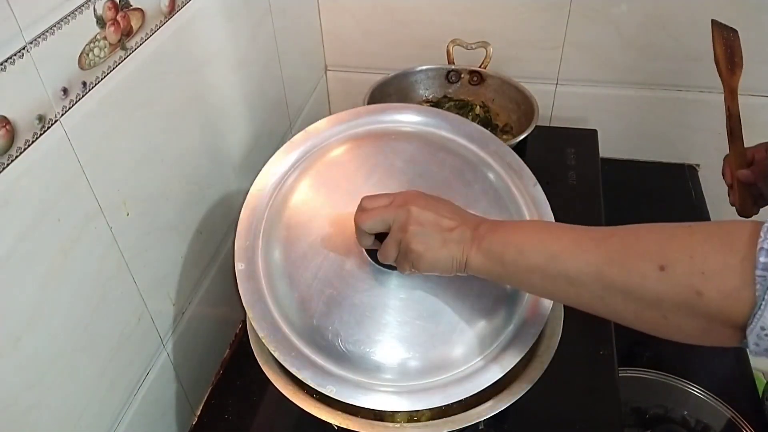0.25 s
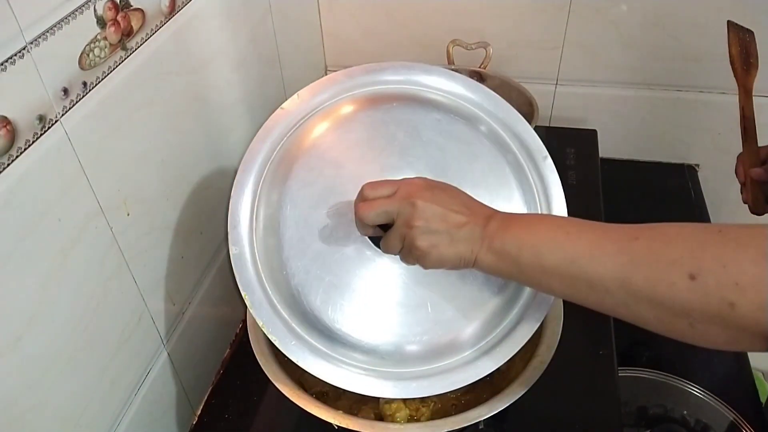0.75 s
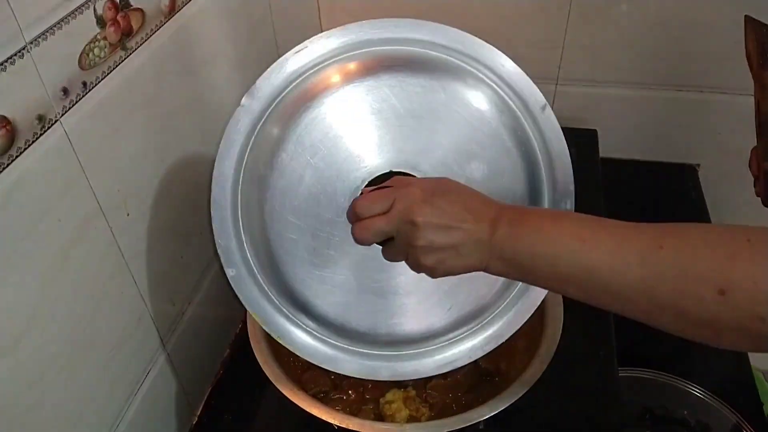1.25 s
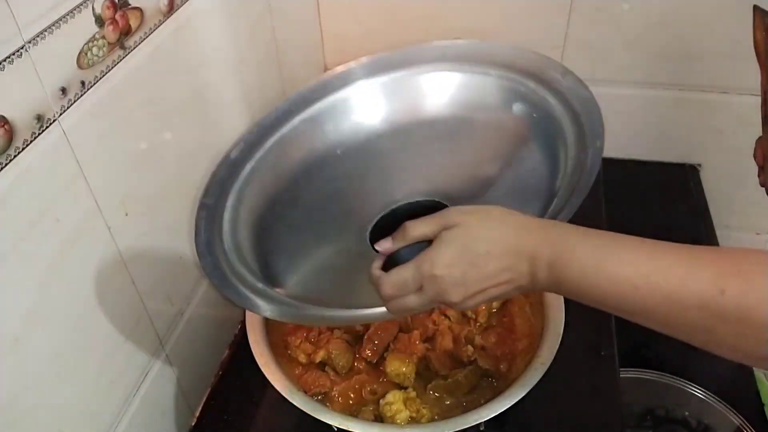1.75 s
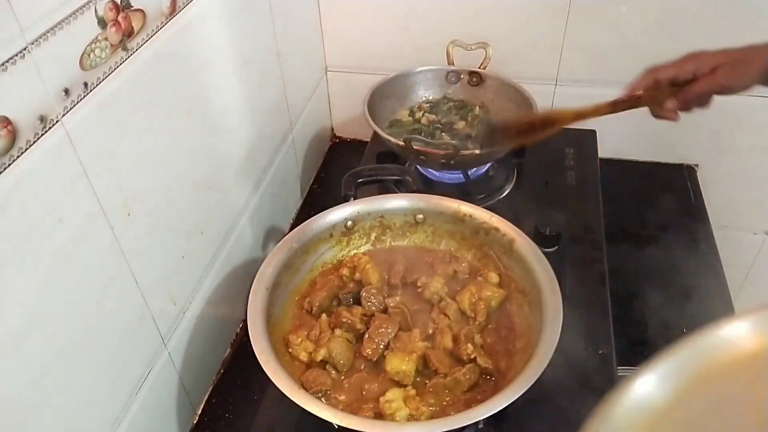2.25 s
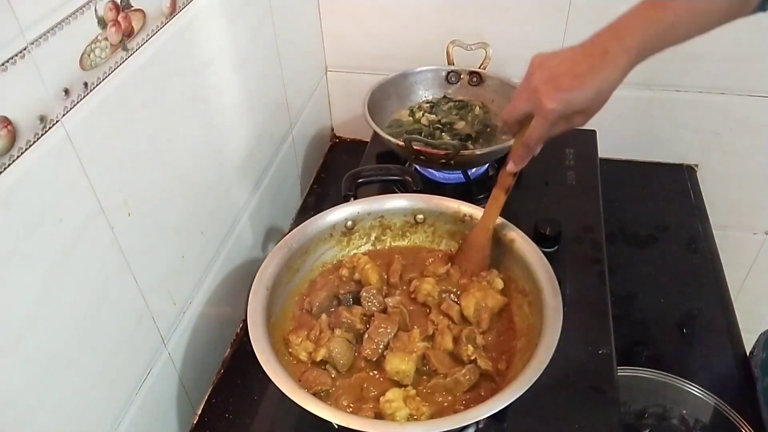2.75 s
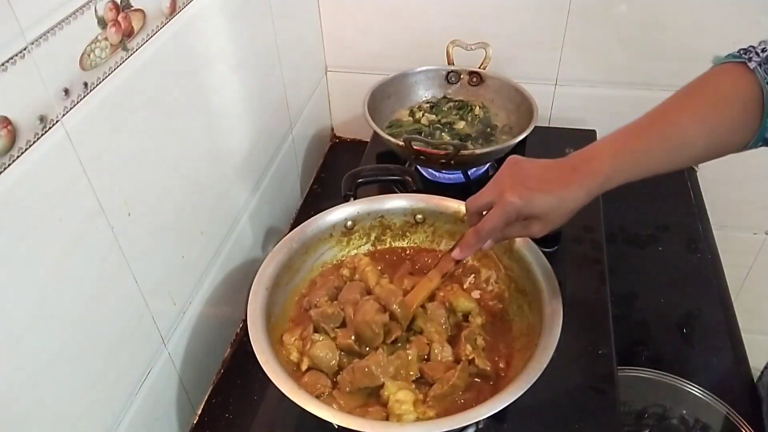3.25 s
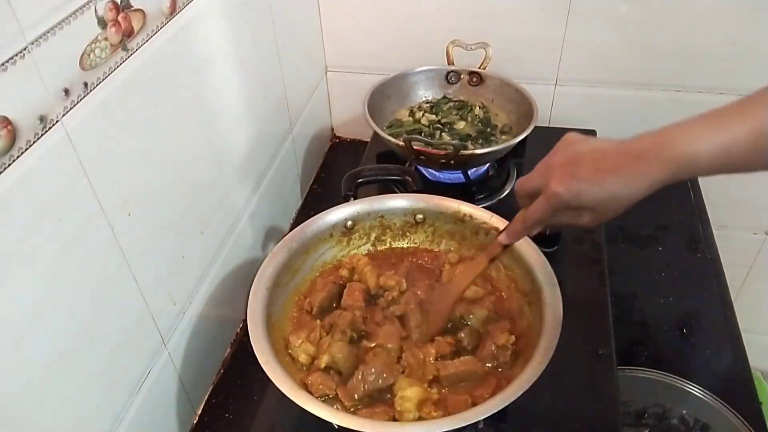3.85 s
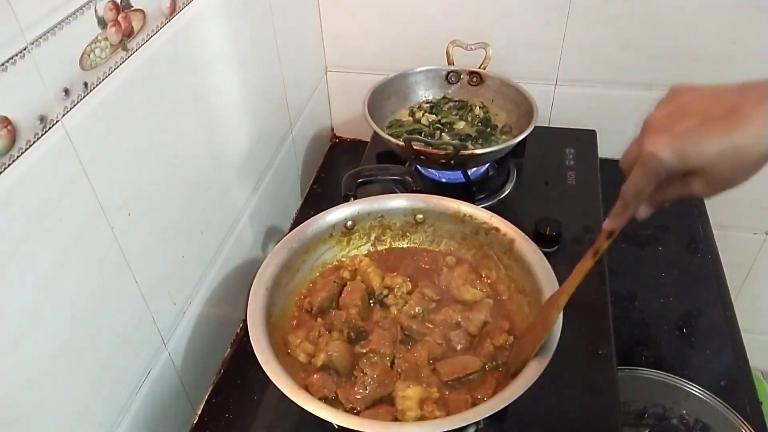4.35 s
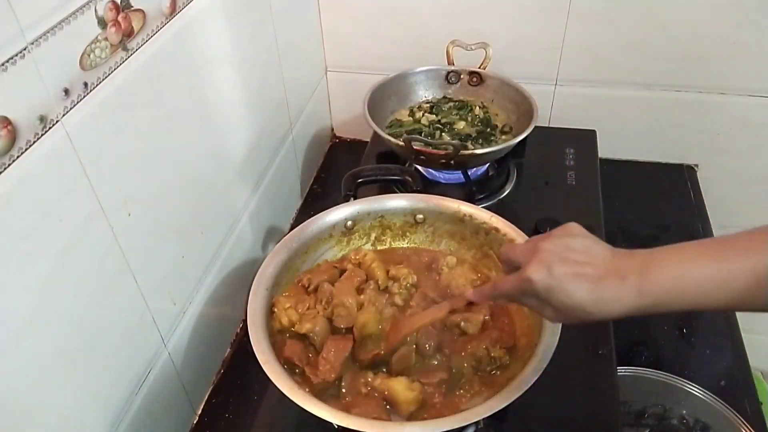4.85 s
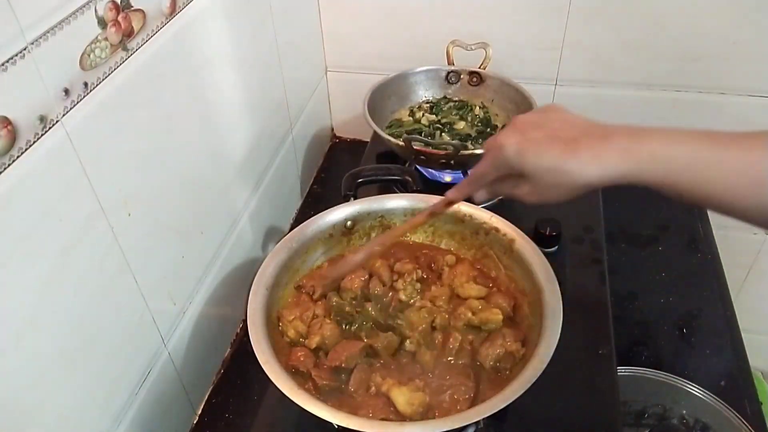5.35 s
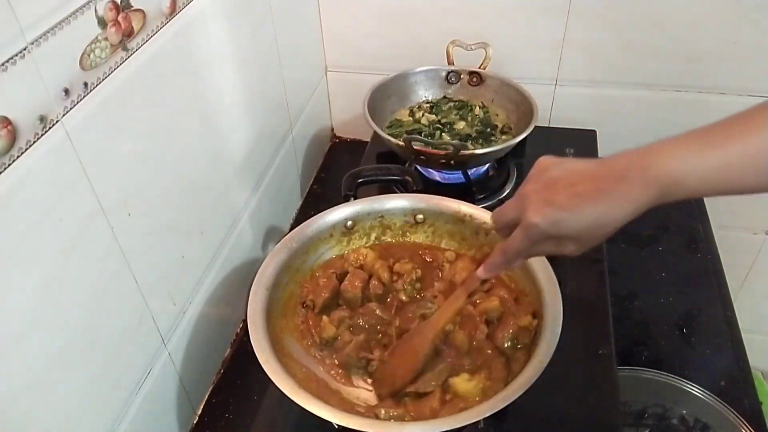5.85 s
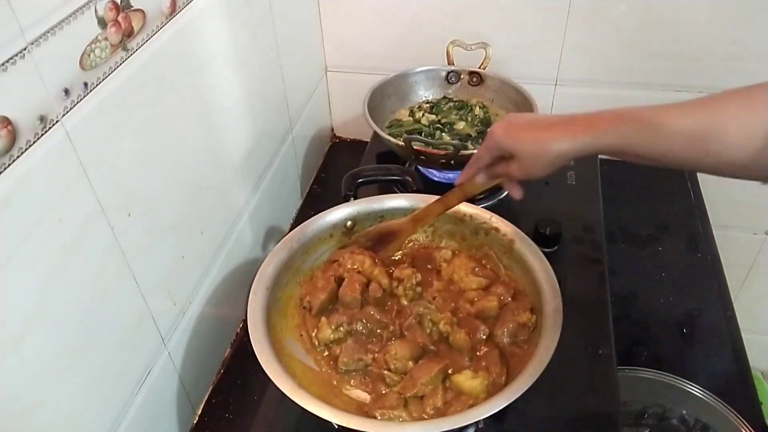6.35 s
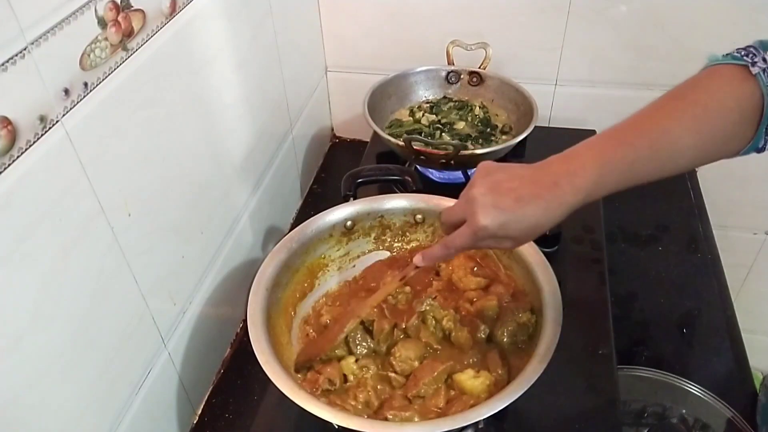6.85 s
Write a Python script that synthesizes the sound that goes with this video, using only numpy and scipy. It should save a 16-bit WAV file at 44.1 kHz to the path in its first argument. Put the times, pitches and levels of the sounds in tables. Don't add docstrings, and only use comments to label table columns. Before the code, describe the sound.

A metal pot lid scrapes off with a ring, a wooden spatula stirs simmering curry, the lid clatters loudly down, then scraping and tapping continue.

```python
import sys
import numpy as np
from scipy import signal
from scipy.fft import rfft, irfft, next_fast_len
from scipy.io import wavfile
from scipy.ndimage import uniform_filter1d, map_coordinates

SR = 44100
rng = np.random.default_rng(int(sys.argv[2]) if len(sys.argv) > 2 else 0)


def wrap_up_sound(samples):
    columns = np.atleast_2d(samples).T
    tamed = np.clip(columns, -1, 1)
    steps = np.round(tamed * 32767).astype(np.int16)
    wavfile.write(sys.argv[1], SR, steps)


def voltage_ratio(decibels):
    exponent = np.asarray(decibels, float) / 20
    return 10 ** exponent


N = 312993

# pitch_hz, level_db
SIMMER_COLOUR = [(15, -54), (25, -24), (127, -6.5), (394, -7), (451, -14.5), (575, -4.5), (887, -11),
                 (1740, -8.5), (2280, -8.5), (4610, -9.5), (5500, -17), (6200, -13.5), (7310, -9),
                 (11000, -20), (14800, -17), (16000, -13.5)]
SIMMER_DB = -52.5
# pitch_hz, level_db
AIR_NOTES = [
    [(549, -7), (566, 2), (605, 2), (708, -4.5), (1135, -4.5), (1168, -3.5), (1642, -10), (1755, -6.5),
     (2105, -10), (2789, -5.5)],
    [(1003, -1), (1022, -1.5)],
    [(505, 7.5), (1130, -18)],
]
# start_s, length_s, level_db
AIR_HUMS = [
    [(-.1, 0.72, -50.5), (.4, 0.98, -54), (1.4, 0.75, -61), (3.5, 0.16, -55.5), (4.75, 0.15, -48.5)],
    [(1.05, 1, -64), (1.85, 0.44, -56), (2.65, 0.96, -53)],
    [(0, 1, -62.5), (2.12, 0.065, -62), (2.75, 0.15, -61.5), (5.08, 0.15, -60.5)],
]
HUM_RISE_S, HUM_FALL_DB_S = 0.073, 62

# start_s, length_s, scrape_db, sizzle_over_scrape_db, depth_db
LID_MOVES = [(-.02, 0.075, -40.5, -2, -1.5), (0.053, 0.055, -38, -0.5, -3.5), (0.146, 0.19, -48, 2.5, -2),
             (0.268, 0.16, -50, 2.5, -3.5), (0.41, 0.51, -54, -3, -5.5), (0.963, 0.11, -53, -10, -3.5),
             (1.203, 0.24, -52.5, -10, -7), (1.548, 0.052, -53.5, -4, 2.5), (1.724, 0.097, -49.5, -3.5, -4),
             (1.804, 0.2, -53, -8, -1), (1.97, 0.42, -61, 5.5, 8), (2.43, 0.091, -56.5, 5, 2.5),
             (2.495, 0.19, -59, 1, -2)]
# start_s, length_s, scrape_db, sizzle_over_scrape_db, depth_db
FOOD_TURNS = [(2.645, 0.07, -54.5, -6, 4), (2.7, 0.21, -47.5, -1, -5), (2.885, 0.053, -48.5, 7, 10),
              (2.91, 0.29, -48.5, 1.5, 1.5), (3.169, 0.13, -49.5, -2, -3), (3.27, 0.35, -51, 0, 0.5),
              (3.46, 0.37, -52, -18, -20), (3.638, 0.11, -47.5, -1.5, -6), (3.76, 0.24, -56.5, -23, -1.5),
              (3.91, 0.14, -52.5, -2, -6.5), (4.17, 0.027, -64, -6, -3), (4.27, 0.32, -57, -12, 2)]
# start_s, length_s, scrape_db, sizzle_over_scrape_db, depth_db
WALL_SCRAPES = [(4.92, 0.17, -49.5, 2, -20), (5.1, 0.061, -57, 7, -24), (5.56, 0.094, -59, 7, -13),
                (5.6, 0.12, -47, -1.5, -6.5), (5.698, 0.1, -36, -3.5, -7), (5.8, .14, -37, -6, -9.5),
                (5.94, 0.026, -49, -4, 2), (6.0, 0.16, -59, -2, 1), (6.26, .1, -52.5, -16, -4.5),
                (6.33, 0.1, -44, -6.5, -6.5), (6.42, .17, -46.5, -2, 1.5), (6.705, 0.052, -61.5, 11.5, 3),
                (6.84, 0.2, -55, -1.5, -4), (7, 0.049, -54.5, -3, -1)]
STROKE_RISE_S, RISE_SHARE = 0.015, 0.34
STROKE_FALL_DB_S, DEEP_DB = 155, 1.5
# pitch_hz, level_db
SCRAPE_COLOUR = [(350, -4.5), (620, 3), (771, 8), (1590, 8.5), (1940, 7.5), (3600, -1), (6000, -8),
                 (7800, -19), (13200, -120)]
# pitch_hz, width_hz, level_db
POT_MODES = [(1360, 140, -16), (1900, 48, -3), (3290, 370, -1), (4400, 100, -14)]
# pitch_hz, level_db
SIZZLE_COLOUR = [(2060, -29), (3500, -6), (3660, -30), (4400, -2.5), (5460, -13), (7130, 3.5), (8310, -5),
                 (10600, -8.5), (14900, -9.5), (16000, -5)]
# start_s, length_s, level_db
SLOSHES = [(-.02, 0.024, -39.5), (0.07, 0.14, -45.5), (0.2, 0.19, -50.5), (1.303, 0.041, -55.5),
           (2.18, 0.059, -60), (2.87, 0.084, -52), (3.49, 0.073, -65), (4.387, 0.15, -56.5),
           (5.612, 0.1, -52.5), (5.777, 0.22, -47.5), (6.004, 0.22, -60.5), (6.3, 0.21, -54),
           (6.51, 0.033, -47.5), (7.003, 0.079, -55)]
SLOSH_RISE_S, SLOSH_FALL_DB_S, BUBBLING_DB = 0.036, 206, -65
# pitch_hz, width_hz, level_db
SAUCE_MODES = [(314, 49, 3.5), (410, 55, 2), (549, 66, 0.5), (725, 23, -3)]
# start_s, length_s, level_db
SHAKES = [(-.02, 0.029, -44), (0.042, 0.35, -50.5), (1.192, 0.32, -61), (1.787, 0.14, -55),
          (2.152, 0.11, -52), (3.3, 0.2, -63), (5.783, 0.044, -39.5), (5.86, 0.13, -43),
          (5.977, 0.068, -37), (6.154, 0.028, -50), (6.735, 0.26, -64), (6.994, 0.077, -55.5)]
SHAKE_RISE_S, SHAKE_FALL_DB_S, FLAME_DB = 0.031, 147, -70.5
# pitch_hz, width_hz, level_db
STOVE_MODES = [(84, 14, -2), (146.8, 11.8, 3.5), (224, 76, -9)]

# start_s, peak_db, pitch_hz, t60_s, left_minus_right_db
TOUCHES = [(0.00407, -34.5, 813, 0.23, 2), (0.0866, -26, 2336, 0.1, 0), (0.15, -36.5, 2336, 0.38, 0),
           (4.417, -31.5, 1304, 0.26, 9), (4.418, -26, 1740, 0.037, 6), (4.417, -46, 2330, 0.14, 7),
           (4.417, -45, 4470, 0.2, -2), (4.417, -47.5, 3600, 0.25, 0.1), (6.304, -36.5, 330, 0.11, 0),
           (5.9, -37, 2000, 0.2, -3), (2, -49, 148, 0.17, 0), (1.872, -51, 148, 0.16, -5),
           (5.945, -33, 151, 0.27, 0), (6.548, -40, 314, 0.19, 1), (2.9, -39, 318, 0.077, .5),
           (2.19, -41.5, 148, 0.48, 0), (5.803, -32.5, 170, 0.28, -2.5), (5.992, -33, 82.4, 0.45, 1),
           (5.993, -37, 149.5, 0.3, 7)]
# start_s, peak_db, pitch_hz, t60_s, left_minus_right_db
LID_NOTES = [(.02, -42, 3620, 0.26, 3), (.062, -33, 3620, 0.16, 0), (0.036, -22.5, 410, .04, 4),
             (0.056, -21, 435, 0.065, 3), (0.065, -26, 428, .08, -5), (0.09, -34, 3140, .2, 5),
             (0.127, -39, 3140, 0.15, 0), (.106, -25.5, 2336, 0.14, -3), (.04, -35, 813, .15, 4),
             (4.52, -22.5, 1821, 0.12, -7), (4.52, -32, 1607, 0.24, 0), (4.523, -28.5, 2600, 0.13, 3),
             (4.61, -24, 303, 0.18, -6), (4.612, -21.5, 2587, 0.14, -6), (4.612, -24.5, 2708, 0.15, 6),
             (4.64, -29, 2605, .12, -1), (4.642, -24, 2310, .12, 0), (4.655, -16, 1618, 0.1, -2),
             (4.656, -26, 1507, 0.16, 1), (4.67, -23.5, 380.6, 0.4, 0), (4.716, -24, 1832, 0.069, -2),
             (4.611, -27, 6884, 0.18, 6), (4.612, -29, 6540, 0.16, 4), (4.642, -27, 6930, 0.11, 0),
             (4.642, -33, 8200, 0.097, 0), (4.418, -45, 332, 0.17, -2), (4.535, -35, 947, 0.13, 7),
             (4.745, -33, 382.4, 0.23, -7)]
# start_s, peak_db
SKIPS = [
    (6.766, -34.5),
    (6.806, -35),
    (6.85, -44),
    (6.876, -44),
    (6.903, -42),
    (6.935, -44),
]
SKIP_HZ, SKIP_T60_S = 932, 0.075
WAVER_RAD = 0.36

# start_s, peak_db, low_db, bright_db, left_minus_right_db
LIFT = [
    (0.012, -28.5, 4, -34, 1.0),
    (0.036, -23.5, -2.5, -23, 0.5),
    (0.065, -26, -0.5, -0.5, 0.0),
    (0.092, -24.5, -18, -2, 1.7),
    (0.107, -30, -32, -3, -1.0),
]
# pitch_hz, width_hz, level_db
RIM_MODES = [(350, 42, 3.5), (435, 45, 0.5), (813, 30, -10.5), (1252, 26, -9), (1670, 21, -13.5),
             (2336, 42, -10), (3240, 32, -21), (3650, 48, -12.5), (4370, 240, -20.5), (6900, 90, -30),
             (7770, 130, -29), (9400, 60, -24)]
# start_s, peak_db, low_db, bright_db, left_minus_right_db
TIP = [
    (4.515, -21, -3, -24, -2.5),
    (4.533, -23.5, -15, -21, 0),
    (4.559, -25, -12, -31, 4),
]
# pitch_hz, width_hz, level_db
EDGE_MODES = [(204, 143, 9), (965, 23, 0), (1600, 120, -0.5), (1870, 140, 4.5), (2330, 85, -1.5),
              (3360, 140, -3), (4200, 110, -10)]
# start_s, peak_db, low_db, bright_db, left_minus_right_db
CLATTER = [
    (4.601, -16, -4.5, -17, 4),
    (4.61, -11.5, -7.5, -13.5, -2),
    (4.639, -10.5, -12, -13.5, -3),
    (4.657, -16, 1.5, -28, -1),
    (4.674, -27, -1, -18, 0),
    (4.704, -17, -1.5, -5.5, 3),
    (4.719, -20.5, -3, -21, -1),
    (4.754, -30, 4, -25, 3),
]
# pitch_hz, width_hz, level_db
LID_MODES = [(150, 88, -5), (230, 40, 0), (300, 60, -5), (382, 45, 5), (437, 45, 1), (680, 114, -14),
             (932, 40, -10), (1518, 45, -2), (1611, 45, 0), (1660, 50, -6), (1821, 60, -9),
             (1893, 60, -9), (2225, 55, -7), (2351, 55, -7), (2610, 60, -12),
             (3151, 40, -11), (3750, 60, -12), (4740, 45, -12), (5626, 60, -16), (6300, 70, -14),
                  (6884, 45, -7), (7284, 60, -13), (7559, 45, -7), (8310, 60, -16)]
# pitch_hz, level_db
RATTLE_COLOUR = [(29, -59), (50, -29), (138, -10), (258, -0.5), (371, 3.5), (572, -26), (905, -11),
                 (1330, -11), (1620, -6), (5950, -9.5), (7390, -9), (16000, -22.5)]
DAMPING = 1.6
SPOT_DB, RATTLE_GRIT_DB = 2.5, 2.5

# start_s, peak_db, centre_hz, left_minus_right_db
KNOCKS = [(1.6, -35, 3970, 0), (1.785, -34.5, 4400, 0), (2.3, -36.5, 3680, -2), (2.616, -41, 977, 0),
          (2.66, -30, 1210, -1), (2.845, -35, 2170, -2), (3.252, -39, 1500, -3), (3.433, -37, 3400, 0),
          (2.899, -34, 816, .5), (2.945, -35, 1300, 0), (2.959, -36, 890, 3), (2.98, -35, 1120, 3),
          (3.087, -27.5, 3970, 2), (3.166, -35.5, 953, 2), (3.189, -36, 1110, -2), (3.481, -28, 1950, -1),
          (3.536, -36, 1770, -2), (3.549, -31, 1760, 0), (3.564, -33, 2600, -2), (3.594, -34, 3000, -4),
          (3.668, -42, 620, -3), (4.188, -42, 1380, -7), (4.29, -32, 4100, 0), (4.56, -24.5, 684, -2),
          (5.002, -32, 2600, -4), (5.09, -53, 2100, 2), (5.733, -28, 1860, 1), (5.739, -23, 1900, 0),
          (5.742, -24, 1500, 5), (5.753, -28, 1430, 3), (5.77, -30, 3520, 0), (5.875, -33, 3400, 0),
          (5.888, -25, 2320, 4), (5.893, -27, 4020, 0), (5.927, -30.5, 1400, 0), (5.945, -42, 3400, 0),
          (5.98, -36, 2170, 7), (5.572, -36, 12200, 3), (6.273, -38.5, 4350, -4), (6.364, -35, 1600, -5),
          (6.432, -33, 1320, 2), (6.467, -30, 1700, 7), (6.491, -33, 1390, 7), (6.506, -30, 1380, 2.5),
          (6.531, -31, 1710, 0), (6.551, -39, 1400, 0), (6.865, -35.5, 2620, -7), (6.869, -37, 3180, 0)]
# start_s, length_s, level_db, from_hz, to_hz
SWEEPS = [(1.778, 0.11, -53, 1200, 1147), (2.191, 0.088, -57, 562, 506), (2.645, 0.0454, -55, 1296, 1000),
          (2.792, .1, -51.5, 2920, 2000), (2.819, .1, -54, 3300, 3210), (2.89, .11, -50, 1200, 845),
          (3.031, 0.23, -55.5, 1196, 943), (3.18, .09, -51, 2750, 2650), (3.362, 0.15, -52, 2150, 1960),
          (3.52, 0.26, -51.5, 1750, 1850), (3.556, .13, -56, 2550, 2750), (3.649, 0.087, -59, 624, 600),
          (3.897, 0.098, -53, 1760, 1900), (3.933, .15, -56, 3400, 3300), (4.031, 0.092, -58, 1950, 2060),
          (4.927, 0.14, -52, 2150, 2034), (5.607, 0.12, -52, 2105, 2370), (6.33, 0.15, -50, 2250, 2250),
          (6.362, 0.18, -58, 3100, 3170), (6.349, 0.2, -47, 1610, 1283)]
SWEEP_WIDTH_HZ, SWEEP_RISE_S = 300, 0.016

# pitch_hz, side_minus_mid_db
STEREO_WIDTH = [(60, -21), (110, -32), (200, -18.5), (380, -11), (700, -2), (1290, -1), (4400, -1),
                (15000, 0)]
# pitch_hz, t60_s
ROOM_DECAY = [(100, 0.34), (1000, 0.68), (4000, 0.61), (12000, 0.92)]
TOUCH_ROOM_DB = -9
# pitch_hz, left_minus_right_db
MIC_TILT = [(60, -0.5), (200, -0.5), (1290, 0.5), (4400, -1.5), (15000, 2.5)]
LOW_CUT_HZ, TOP_HZ = 54, 15590


def unit(x):
    return x / np.sqrt(np.mean(x ** 2) + 1e-20)


def along(points, hz):
    f, v = np.transpose(points)
    return np.interp(np.log(hz + 1), np.log(f + 1), v)


def wobble(rate, size=N):
    s = np.linspace(0, N / SR, N // 32)
    knots = rng.standard_normal(int(N * rate / SR) + 4)
    coarse = map_coordinates(knots, [s * rate])
    return np.interp(np.arange(size) * (N / SR / size), s, coarse)


def filtered(x, response):
    m = next_fast_len(x.shape[-1] + SR // 4)
    spectrum = rfft(x, m) * response(np.fft.rfftfreq(m, 1 / SR))
    return irfft(spectrum, m)[..., :x.shape[-1]]


def modes(table, f):
    total = 0
    for k, (hz, width, db) in enumerate(table):
        peak = 1j * f * width / (hz * hz - f * f + 1j * f * width)
        total = total + (-1) ** k * voltage_ratio(db) * peak
    return total


def spread(pair):
    mid = pair[0]
    side = filtered(pair[1], lambda hz: voltage_ratio(along(STEREO_WIDTH, hz)))
    return np.array([mid + side, mid - side])


def rush(response, patchy_db, grit_db, streak_db):
    z = signal.stft(rng.standard_normal((2, N)), nperseg=1024)[2]

    def blurred(across_pitch, across_time):
        grain = rng.standard_normal(z.shape[1:])
        return unit(uniform_filter1d(uniform_filter1d(grain, across_pitch, 0), across_time, 1))

    uneven_db = patchy_db * blurred(12, 5) + streak_db * blurred(2, 14)
    pair = signal.istft(z * voltage_ratio(uneven_db), nperseg=1024)[1][:, :N]
    pair = pair * voltage_ratio(grit_db * (wobble(300) + 0.82 * wobble(30)))
    pair = filtered(pair, response)
    return spread(pair) / np.sqrt(np.mean(pair[0] ** 2))


def swells(start, length, db, rise, fall_db, rest_db=-120):
    start, length, db, rise = [np.reshape(v, (-1, 1)) for v in (start, length, db, rise)]
    s = np.arange(0, N / SR + 0.002, 0.002)
    since = s - start
    over = np.maximum(since - length, 0)
    onset = np.sin(np.pi / 2 * np.clip(since / rise, 0, 1)) ** 2
    shape = onset * voltage_ratio(db - fall_db * over)
    gain = np.sqrt(np.sum(shape ** 2, 0) + voltage_ratio(rest_db) ** 2)
    return np.interp(np.arange(N) / SR, s, gain)


def add(out, s, db, pan_db, sound):
    spot = out[:, round(s * SR):][:, :sound.shape[1]]
    gain = voltage_ratio(db + np.array([[pan_db / 2], [-pan_db / 2]]))
    spot += (gain * sound)[:, :spot.shape[1]]


def simmer():
    hiss = rush(lambda f: voltage_ratio(along(SIMMER_COLOUR, f)), patchy_db=2.1, grit_db=1.2, streak_db=3.9)
    swell_db = 1.1 * wobble(7.3)
    return voltage_ratio(SIMMER_DB + swell_db) * hiss


def hollow():
    out, t = 0, np.arange(0, N, 4) / SR
    for hums, air in zip(AIR_HUMS, AIR_NOTES):
        level = swells(*np.transpose(hums), HUM_RISE_S, HUM_FALL_DB_S)[::4]
        for hz, db in air:
            turn = 2 * np.pi * hz * t + 2.1 * wobble(40, len(t))
            apart = 0.63 * wobble(11, len(t))
            flicker_db = 3 * wobble(14, len(t))
            tone = np.sin(turn + np.array([apart, -apart]))
            out = out + level * voltage_ratio(db - 3.5 + flicker_db) * tone
    return signal.resample_poly(out, up=4, down=1, axis=1)[:, :N]


def scrape_and_sizzle():
    start, length, db, wet_db, depth_db = np.transpose(LID_MOVES + FOOD_TURNS + WALL_SCRAPES)
    rise = STROKE_RISE_S + RISE_SHARE * length

    def stroke(extra_db):
        return swells(start, length, db + extra_db, rise, STROKE_FALL_DB_S)

    slips = voltage_ratio(0.061 * wobble(28))
    scrape = rush(lambda f: voltage_ratio(along(SCRAPE_COLOUR, f) - 2.0) + modes(POT_MODES, f),
                  patchy_db=1.2, grit_db=2.2, streak_db=3.3)
    low = filtered(scrape, lambda f: 1 / (1 + (f / 1500) ** 6))
    deep = stroke(np.clip(depth_db + DEEP_DB, -12, 6))
    scrape = deep * low + stroke(0) * (scrape - low)
    film = rush(lambda f: voltage_ratio(along(SIZZLE_COLOUR, f)), patchy_db=0.5, grit_db=1.4, streak_db=4.5)
    return slips * (scrape + stroke(wet_db) * film)


def slosh():
    level = swells(*np.transpose(SLOSHES), SLOSH_RISE_S, SLOSH_FALL_DB_S, BUBBLING_DB)
    return level * rush(lambda f: modes(SAUCE_MODES, f), patchy_db=1.2, grit_db=1.2, streak_db=2.2)


def shake():
    level = swells(*np.transpose(SHAKES), SHAKE_RISE_S, SHAKE_FALL_DB_S, FLAME_DB)
    return level * rush(lambda f: modes(STOVE_MODES, f), patchy_db=0.5, grit_db=1.0, streak_db=3.5)


def touches():
    out, t = np.zeros((2, N)), np.arange(SR // 3) / SR
    skips = [(s, db, SKIP_HZ, SKIP_T60_S, 2) for s, db in SKIPS]
    for s, db, hz, t60, pan_db in TOUCHES + LID_NOTES + skips:
        high = min(1, hz / 500)
        drift = map_coordinates(rng.standard_normal(24), [t * 60])
        phase = (rng.uniform(-1.48, 0.71, (2, 1)) + WAVER_RAD * drift) * high
        level = voltage_ratio(-60 * t / t60) * (1 - np.exp(-t / 0.003))
        add(out, s, db, pan_db, np.sin(2 * np.pi * hz * t + phase) * level)
    return out


def lid(contacts, resonances, rattle_db, rise, fall):
    out, t = np.zeros((2, N)), np.arange(SR // 4) / SR
    for s, db, low_db, bright_db, pan_db in contacts:
        shape = (1 - np.exp(-(t / rise) ** 2)) * np.exp(-t / fall)
        grit = map_coordinates(rng.standard_normal(80), [t * 300])
        blow = rng.standard_normal((2, len(t))) * shape * voltage_ratio(RATTLE_GRIT_DB * grit)
        spot = [(hz, DAMPING * w, level + rng.normal(0, SPOT_DB)) for hz, w, level in resonances]
        tone = [(500, low_db), (900, 0), (3200, 0), (6000, bright_db + 10.5)]

        def metal(f):
            rattle = voltage_ratio(along(RATTLE_COLOUR, f) + rattle_db)
            return voltage_ratio(along(tone, f)) * (modes(spot, f) + rattle)

        ring = filtered(blow, metal)
        add(out, s, db, pan_db, spread(ring / np.abs(ring).max()))
    return out


def knocks():
    out, t = np.zeros((2, N)), np.arange(SR // 20) / SR
    for s, db, hz, pan_db in KNOCKS:
        crack = (t == 0) + 0.23 * rng.standard_normal((2, len(t))) * np.exp(-t / 0.0036)
        crack = filtered(crack, lambda f: modes([(hz, 0.37 * hz, 0)], f) ** 2)
        add(out, s, db, pan_db, crack / np.abs(crack).max())
    return out


def sweep():
    out = np.zeros((2, N))
    for start, length, db, from_hz, to_hz in SWEEPS:
        t = np.arange(int((length + 0.3) * SR)) / SR
        pitch = from_hz * (to_hz / from_hz) ** np.clip(t / length, 0, 1)
        turn = 2 * np.pi * np.cumsum(pitch) / SR
        knots = rng.standard_normal((4, 400))
        a, b, c, d = [map_coordinates(row, [t * SWEEP_WIDTH_HZ]) for row in knots]
        band = np.array([a, c]) * np.sin(turn) + np.array([b, d]) * np.cos(turn)
        onset = np.sin(np.pi / 2 * np.clip(t / SWEEP_RISE_S, 0, 1)) ** 2
        level = onset * voltage_ratio(-STROKE_FALL_DB_S * np.maximum(t - length, 0))
        add(out, start, db, 0, level * band)
    return out


def kitchen(x):
    hz, t, z = signal.stft(rng.standard_normal((2, SR)), SR, nperseg=256)
    fade = voltage_ratio(-60 * t / along(ROOM_DECAY, hz)[:, None])
    tail = signal.istft(z * fade, SR, nperseg=256)[1]
    tail = spread(tail / np.linalg.norm(tail[0]))
    late = np.pad(x.mean(0), (300, 0))[None]
    return signal.fftconvolve(late, tail, axes=1)[:, :N]


def scene():
    steady = simmer() + hollow()
    stirring = scrape_and_sizzle() + slosh() + shake()
    rung = touches()
    hits = lid(LIFT, RIM_MODES, rattle_db=-20.5, rise=0.001, fall=0.016)
    hits += lid(TIP, EDGE_MODES, rattle_db=-4.5, rise=0.0022, fall=0.049)
    hits += lid(CLATTER, LID_MODES, rattle_db=-4.5, rise=0.0039, fall=0.013)
    ticks = knocks()
    send = voltage_ratio(0.2) * hits + voltage_ratio(TOUCH_ROOM_DB) * rung + voltage_ratio(-2.0) * ticks
    return steady + stirring + rung + hits + ticks + sweep() + kitchen(send)


def low_pass(x):
    return signal.sosfilt(signal.butter(12, 16350, fs=SR, output="sos"), x)


def record(dry):
    def microphones(hz):
        low_cut = 1 / (1 + (LOW_CUT_HZ / (hz + 1)) ** 4) ** 0.5
        tilt = voltage_ratio(along(MIC_TILT, hz) * np.array([[0.5], [-0.5]]))
        return (hz < TOP_HZ) * low_cut * tilt

    return low_pass(filtered(dry, microphones))


dry = scene()
out = record(dry)
wrap_up_sound(out)
```